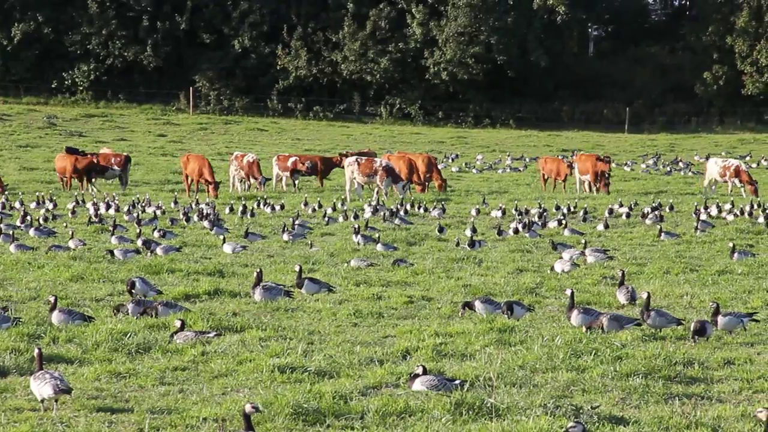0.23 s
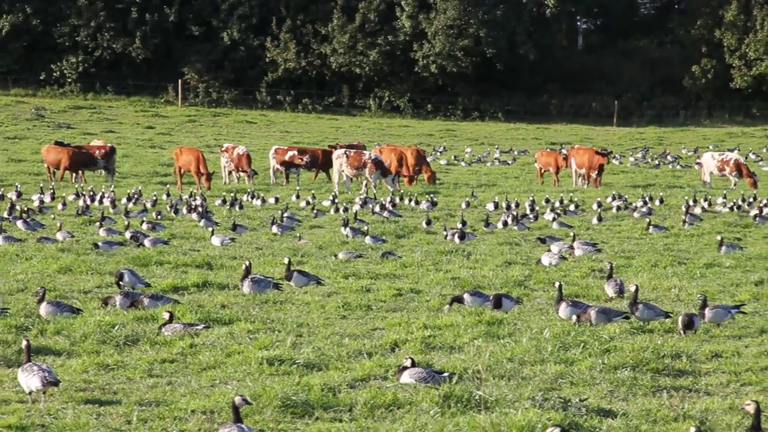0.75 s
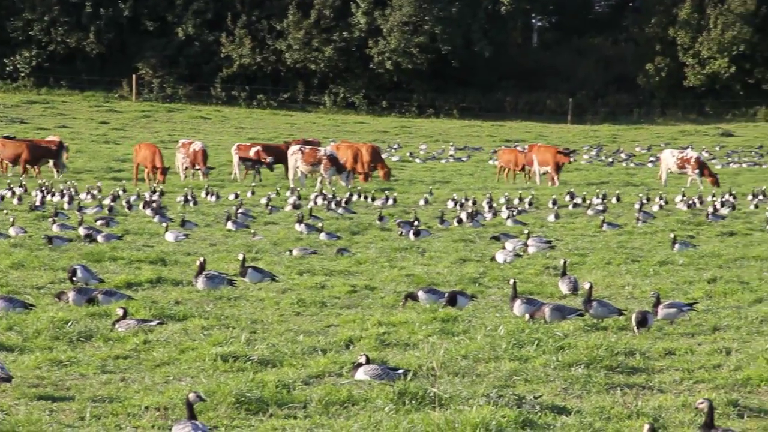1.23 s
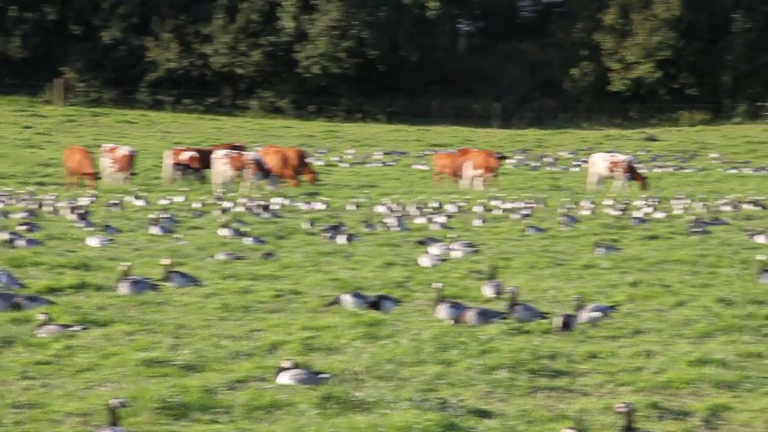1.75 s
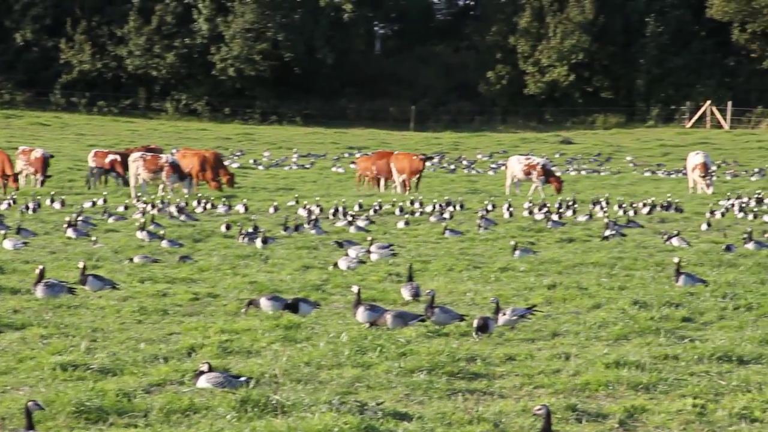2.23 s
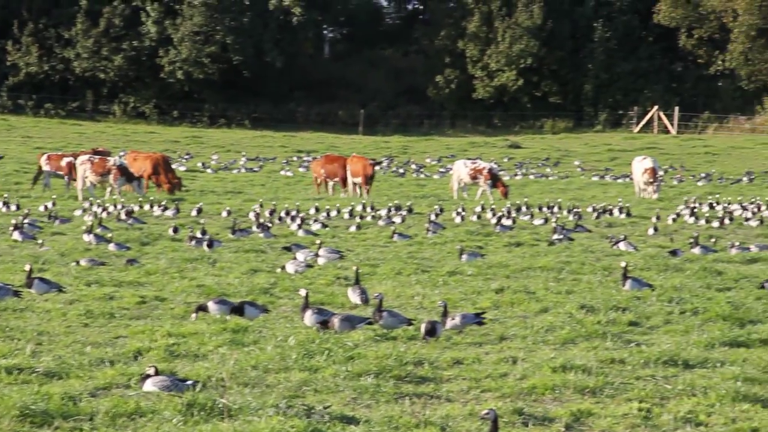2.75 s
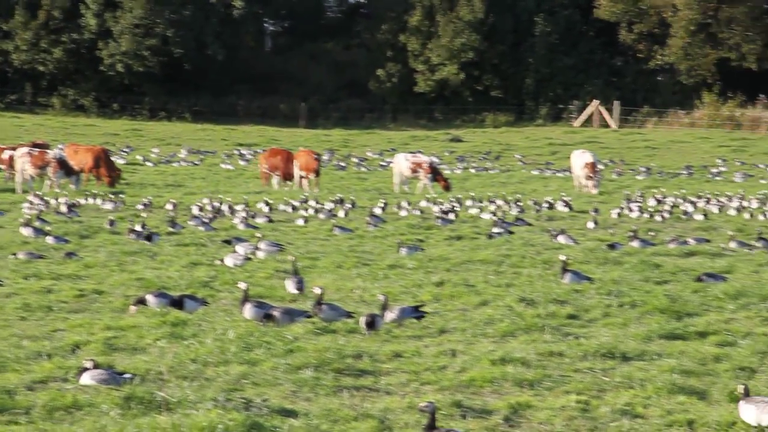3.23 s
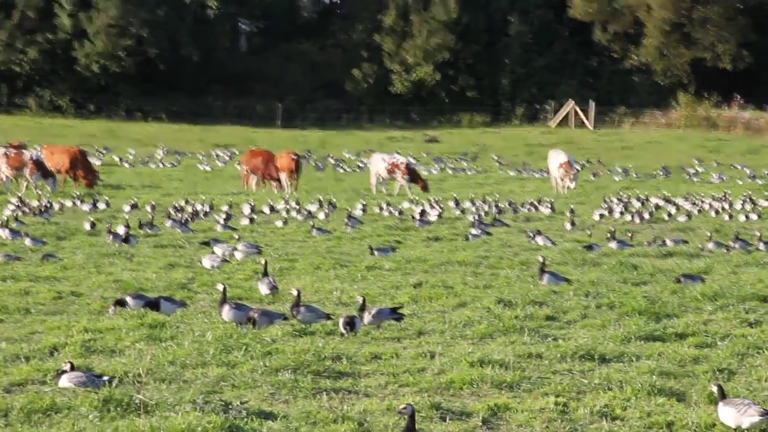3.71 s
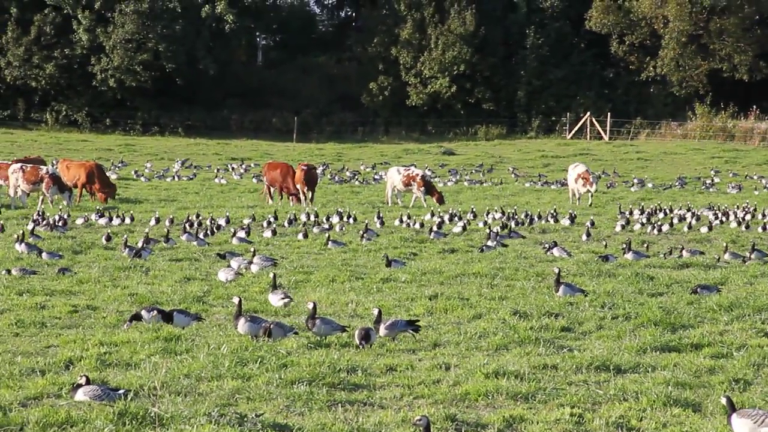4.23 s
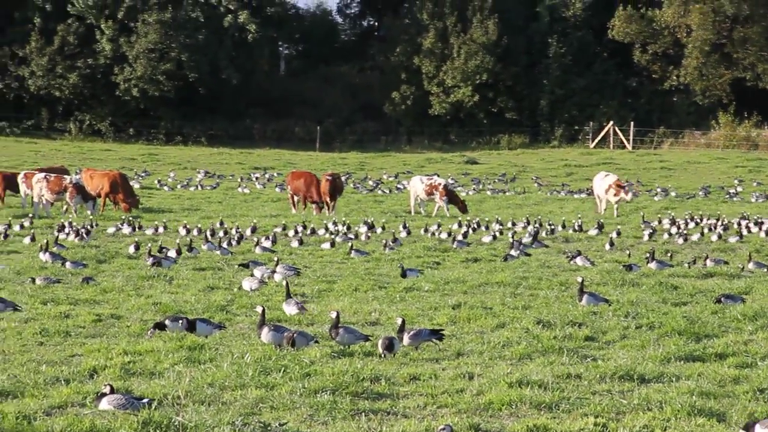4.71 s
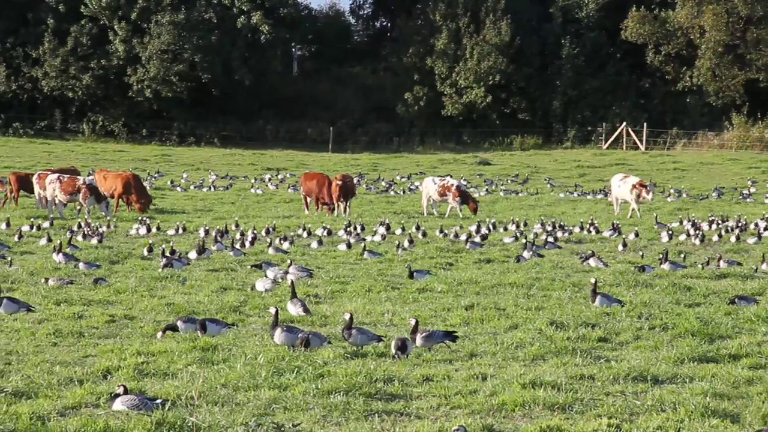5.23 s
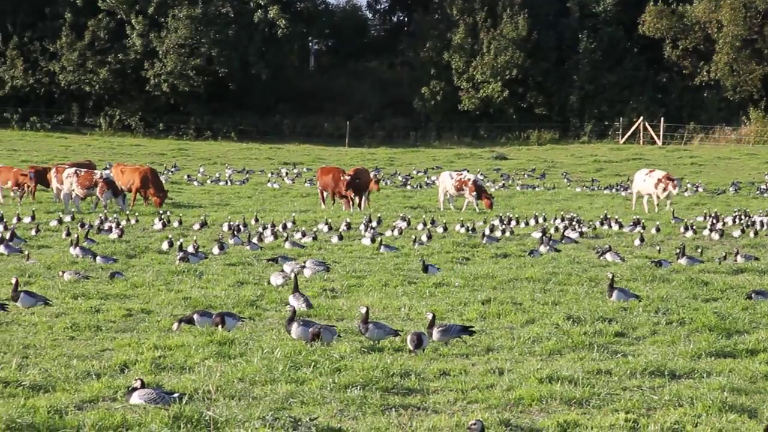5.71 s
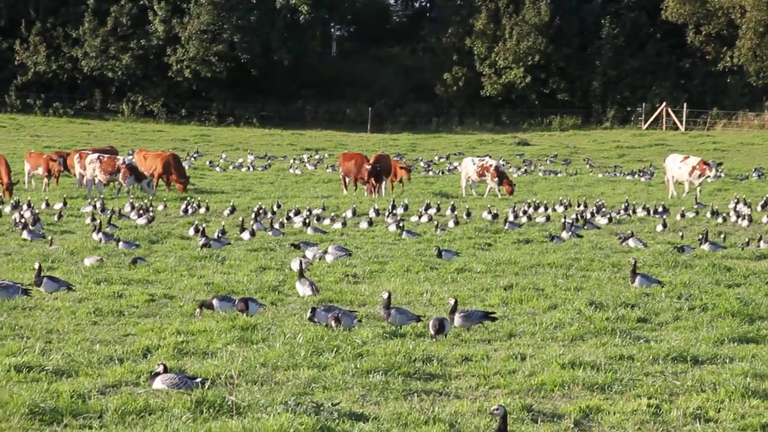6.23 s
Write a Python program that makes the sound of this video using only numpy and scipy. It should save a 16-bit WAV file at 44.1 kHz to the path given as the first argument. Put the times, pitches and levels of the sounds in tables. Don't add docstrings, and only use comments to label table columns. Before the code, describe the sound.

A large flock of geese yaps and barks continuously across an open windy pasture, one bird close by, wind thumping the microphone.

```python
import sys
import numpy as np
from scipy import signal
from scipy.fft import rfft, irfft
from scipy.io import wavfile
from scipy.ndimage import uniform_filter1d

SR = 44100
rng = np.random.default_rng(int(sys.argv[2]) if len(sys.argv) > 2 else 0)


def natural_amplitude(level_db):
    exponent = np.asarray(level_db, float) / 20
    return 10 ** exponent


def dump_mix(stems):
    frames = np.atleast_2d(stems).T
    limited = np.clip(frames, -1, 1)
    pcm = np.round(limited * 32767).astype(np.int16)
    wavfile.write(sys.argv[1], SR, pcm)


N = 284886

LONGEST = 8500
HOOK = 1.15

# f/Hz, gain/dB
THROAT = [(700, -32.5), (1300, -14), (1500, -5), (1750, 2), (2300, -2), (2700, -5.5), (3100, -11),
          (4200, -19.5), (5200, -13), (6200, -15.5), (7500, -23.5), (10000, -31), (12000, -29.5),
          (15500, -59)]


def curve(table):
    rows = np.array(table, float)
    return np.interp(np.arange(N) / SR, rows[:, 0], rows[:, 1])


def shape_db(points, hz):
    rows = np.array(points, float)
    return np.interp(np.log(np.maximum(hz, 1)), np.log(rows[:, 0]), rows[:, 1])


def colour(x, points, size=4096):
    hz = np.arange(size // 2 + 1) * SR / size
    cepstrum = irfft(np.log(natural_amplitude(shape_db(points, hz))), size)
    cepstrum[1:size // 2] *= 2
    cepstrum[size // 2 + 1:] = 0
    impulse_response = irfft(np.exp(rfft(cepstrum)), size)
    return signal.oaconvolve(x, impulse_response)[:N]


def unit(x):
    return x / np.sqrt(np.mean(x ** 2))


def walk(rate, size=N):
    hold = max(int(SR / rate), 1)
    steps = np.repeat(rng.standard_normal(size // hold + 1), hold)
    return 1.19 * uniform_filter1d(uniform_filter1d(steps, hold), hold)[:size]


def field():
    # f/Hz, density/(dB per Hz)
    spectrum = [(88, -19.5), (150, 0), (530, -11.5), (813, -8), (1270, -12.5), (1840, -12), (2610, -25),
                (3850, -33.5), (5350, -32), (7450, -41.5), (15600, -45.5)]
    # t/s, level/dB
    swell = [(0.0, -38.5), (1.6, -39), (2.3, -39.5), (2.6, -37.5), (3.1, -39), (4.6, -40), (5.2, -38.5),
             (6.46, -38.5)]
    out = np.zeros(N)
    for hz in 200 * 2. ** np.arange(7):
        band = [(hz / 2, -40), (hz / 1.71, -3), (hz, 0), (hz * 1.48, -3), (hz * 2, -40)]
        out += natural_amplitude(1.34 * walk(5.42)) * colour(rng.standard_normal(N), band)
    return natural_amplitude(curve(swell) + 3.0) * unit(colour(out, spectrum))


def drone():
    firing_hz = 72.86
    # multiple of the firing rate, level/dB
    orders = [(4, -5), (5, 5.5), (6, 0.5), (10, 0.5)]
    # t/s, level/dB
    level = [
        (0, -95),
        (.3, -46),
        (1.1, -48.5),
        (1.5, -87),
        (2.4, -54),
        (2.9, -49.5),
        (3.5, -52.5),
        (4.0, -87),
        (6.46, -71),
    ]
    phase = 2 * np.pi * np.cumsum(firing_hz * (1 + 0.007 * walk(6))) / SR
    lines = sum(natural_amplitude(db + 3.0 * walk(5.77)) * np.sin(k * phase) for k, db in orders)
    return natural_amplitude(curve(level)) * lines


def wind():
    # t/s, level/dB
    gust = [(0.0, -34.5), (0.32, -36), (0.74, -29.5), (0.86, -36.5), (1.4, -39.5), (2.39, -33), (2.5, -30),
            (3.17, -38), (3.54, -31.5), (3.62, -30), (3.72, -33), (3.89, -35.5), (4.5, -35), (4.71, -37.5),
            (4.88, -35), (5.59, -35), (6.24, -40.5), (6.46, -51.5)]
    # f/Hz, density/(dB per Hz)
    rumble = [(12, -46), (20, -16), (69, 1.5), (114, 2), (203, -10.5), (325, -16.5), (365, -19.5),
              (600, -18.5), (780, -18), (1320, -120)]
    # t/s, peak level/dB
    slow_thumps = [(0.374, -15.5), (.423, -14.5), (.44, -16), (0.597, -11), (.64, -15.5), (0.677, -15),
                   (0.785, -21), (0.829, -16), (.885, -13), (1.363, -6), (1.921, -14), (2.17, -15.5),
                   (2.323, -17), (2.466, -16.5), (2.777, -18), (3.295, -14.5), (3.331, -22), (3.433, -16),
                   (3.463, -16.5), (3.558, -15), (3.584, -14), (3.618, -18), (3.717, -16), (3.756, -20),
                   (3.766, -15.5), (3.78, -16), (3.897, -18), (5.275, -18)]
    # t/s, peak level/dB
    quick_thumps = [(.31, -13.5), (.32, -13), (.569, -11), (.623, -9.5), (1.211, -9), (1.466, -19),
                    (1.639, -13), (2.13, -14.5), (2.36, -15.5), (2.407, -18), (2.62, -12.5), (2.642, -17),
                    (2.807, -13), (2.892, -18), (3.413, -17), (3.515, -13.5), (3.65, -17), (3.676, -12.5),
                    (3.951, -17.5), (4.768, -20), (5.033, -22), (4.16, -22.5), (4.047, -21), (5.286, -17.5),
                    (5.329, -20), (5.452, -19), (5.439, -21)]
    lumps = natural_amplitude(4.2 * walk(45))
    out = natural_amplitude(curve(gust) + 2.0) * unit(colour(lumps * rng.standard_normal(N), rumble))
    for table, hz in ((slow_thumps, 116), (quick_thumps, 158.6)):
        for when, db in table:
            centre = int(when * SR)
            cycles = np.arange(-700, 1400) * hz / SR
            width = np.where(cycles < 0, .45, .75)
            edge = 0.26 * np.sin(2 * np.pi * 2.2 * cycles) * np.exp(-(cycles / 0.21) ** 2)
            thump = (np.sin(2 * np.pi * cycles) + edge) * np.exp(-(cycles / width) ** 2)
            out[centre - 700:centre + 1400] += natural_amplitude(db - 2.5) * thump
    return out


def rustles():
    # t/s, length/s, centre f/Hz, bandwidth/octaves, level/dB
    swishes = [(4.28, 0.15, 11000, .85, -50.5), (5.42, .06, 5700, 0.28, -45), (5.425, .05, 9500, .5, -58),
               (5.83, .13, 11000, .85, -58), (2.04, .07, 9800, .85, -48.5), (3, .045, 4100, .85, -48),
               (2.04, 0.066, 6100, 0.42, -40.5), (3.1, .08, 12000, .85, -60), (3.692, .06, 11500, .85, -61),
               (5.265, 0.055, 5600, .3, -48), (5.345, .045, 5800, .3, -53), (3.945, .07, 5800, .45, -51),
               (3.774, .007, 5500, 1.2, -50), (1.845, 0.055, 5900, 0.27, -45), (1.5, .09, 5300, 0.32, -49),
               (1.892, .006, 4200, .4, -46), (6.285, .05, 5700, .3, -47), (.545, .025, 3800, .1, -55)]
    out = np.zeros(N)
    for start, length, hz, octaves, db in swishes:
        size, first = int(length * SR), int(start * SR)
        half = 2 ** (octaves / 2)
        band = signal.butter(2, [hz / half, min(hz * half, 20000)], "band", fs=SR, output="sos")
        swish = unit(signal.sosfilt(band, rng.standard_normal(LONGEST)))
        swish = swish * natural_amplitude(2.0 * walk(51, size=LONGEST))
        out[first:first + size] += natural_amplitude(db) * signal.windows.tukey(size, .7) * swish[:size]
    return out


def add_call(bus, start, length, hz, glide, arch, db, lines, throat, treble_db=0., knee_hz=2360.0, jitter=.004,
             rasp=.2, scatter=0.99, swell=2.24, scoop=1., strain=1.6, unlock=1.33):
    tiers_hz = [3500, 7000, 10000]
    multiple, line_db = lines
    size = min(int(length * (1 + HOOK) / 2 * SR), LONGEST)
    tremble, shimmer, flutter = (walk(rate, size=LONGEST)[:size] for rate in (350, 1500, 70))
    shimmer = 1.2 * (shimmer - uniform_filter1d(shimmer, SR // 250))
    chance = rng.standard_normal((2, len(multiple)))

    u = np.linspace(-1, HOOK, size)
    lean = np.where(u < 0, scoop, 2 - scoop)
    sag = arch * lean * np.abs(u) ** 2.46
    pitch = hz * np.exp((glide * u - sag) / 100 + jitter * tremble)
    phase = 2 * np.pi * np.cumsum(pitch) / SR

    line_hz = multiple * hz
    octaves_up = np.maximum(np.log2(line_hz / knee_hz), 0)
    gain = natural_amplitude(line_db + treble_db * octaves_up + 3.2 * scatter * chance[0])
    heard = (gain * natural_amplitude(shape_db(throat, line_hz)))[(line_hz > 1400) & (line_hz < 3200)]
    keep = (line_hz > 600) & (line_hz < SR / 2.7)
    offset = (unlock * line_hz / knee_hz * chance[1])[keep, None]
    angle = np.outer(multiple[keep], phase) + offset
    partials = gain[keep, None] * np.cos(angle.astype(np.float32))

    tier = np.digitize(line_hz[keep], tiers_hz)
    effort = np.clip(1 - np.where(u < 0, -u ** 3, (u / HOOK) ** 2), 0, 1)
    voice = np.zeros(size)
    for k in range(len(tiers_hz) + 1):
        voice += partials[tier == k].sum(axis=0) * effort ** (swell * (1 + strain * k))
    voice *= (1 + rasp * shimmer) / np.sqrt(1 + rasp ** 2) * natural_amplitude(.7 * flutter)
    voice *= natural_amplitude(db + 4.5) / np.sqrt(np.sum(heard ** 2) / 2)
    first = int(start * SR)
    bus[first:first + size] += voice[:N - first]


def two_voices():
    mixing = [-45, 1, 3, 1.5, -29]
    lower_voice = .637
    upper, lower = np.meshgrid(np.arange(1, 15), np.arange(-2, 3))
    line_db = np.array(mixing, float)[:, None] / (1 + 0.068 * upper)
    return (upper + lower_voice * lower).ravel(), line_db.ravel()


def crowd(count=45):
    # t/s, length/s, level/dB
    open_barks = [(.065, 0.11, -37.5), (.188, 0.13, -42.5), (.52, 0.13, -56), (1.292, 0.15, -41.5),
                  (1.497, .14, -39.5), (1.679, 0.13, -35), (1.8, 0.13, -38), (1.979, 0.056, -51),
                  (2.03, .13, -33.5), (2.159, 0.17, -46.5), (2.615, 0.22, -41), (2.84, .16, -33.5),
                  (3.071, 0.15, -29.5), (3.658, .11, -29), (3.82, 0.099, -34), (4.302, 0.23, -43.5),
                  (4.697, .17, -34.5), (5.075, 0.082, -31), (5.349, 0.19, -41.5), (5.742, 0.17, -34.5),
                  (6.143, 0.12, -46.5), (6.241, 0.16, -37)]
    # t/s, length/s, level/dB
    muffled_barks = [(.343, 0.19, -37.5), (.644, 0.19, -38.5), (.778, 0.18, -35), (1, 0.17, -39.5),
                     (1.164, 0.14, -36.5), (1.414, 0.16, -37), (2.355, 0.11, -38), (2.449, 0.13, -41.5),
                     (2.813, 0.09, -34.5), (2.954, .12, -35), (3.22, 0.055, -36), (3.211, 0.2, -38),
                     (3.514, .19, -39), (3.917, 0.23, -38.5), (4.039, 0.18, -31.5), (4.172, 0.17, -38),
                     (4.394, 0.12, -42), (4.548, 0.12, -34), (4.664, 0.065, -34), (4.884, 0.081, -33.5),
                     (5.225, 0.1, -38.5), (5.238, .15, -34.5), (5.495, .13, -31), (5.627, 0.095, -36.5),
                     (5.866, 0.16, -41), (5.996, .19, -36), (6.4, 0.061, -40.5)]
    bus, stack = np.zeros(N), (np.arange(1., 24), np.zeros(23))
    for table, tilt_db in ((open_barks, -1.46), (muffled_barks, -7)):
        for start, length, db in table:
            for k, (high, slide) in enumerate(rng.random((3, 2))):
                add_call(bus, start + .21 * k * length, .55 * length, 330 + 250 * high, 3 - 9 * slide, 6.,
                         db - 1.5, stack, THROAT, tilt_db, jitter=.015, rasp=.65, strain=1.2)
    for k, (late, long, high, slide) in enumerate(rng.random((count, 4))):
        start = (k + late) / count * N / SR
        add_call(bus, start, 0.0595 + 0.0555 * long, 680 + 250 * high, 1 - 7 * slide, 7.,
                 -52, stack, THROAT, -3., jitter=0.0049, rasp=0.67)
    return colour(bus, THROAT)


def flock():
    # t/s, length/s, upper voice f/Hz, level/dB, treble/dB
    duos = [(.66, 0.1, 1110, -42, -10), (.82, 0.16, 1132, -43, -8.5), (1.03, 0.062, 1127, -36, -36),
            (1.179, 0.12, 1118, -42, -8), (1.413, 0.064, 1156, -37.5, -29),
            (2.057, 0.18, 1121, -38.5, -16.5), (2.349, 0.092, 1120, -32.5, -16.5),
            (2.666, 0.07, 1115, -34.5, -14), (2.952, 0.07, 1092, -34, -15), (3.11, 0.061, 1150, -30.5, -7),
            (3.292, .063, 1139, -39, -13.5), (3.525, 0.15, 1090, -44.5, -25),
            (4.506, 0.073, 1095, -32, -16.5), (4.903, 0.092, 1088, -36, -34)]
    # t/s, length/s, f/Hz, glide/%, level/dB
    bright = [
        (1.345, 0.073, 865, 0, -38.5),
        (1.742, 0.067, 760, 0.5, -33.5),
        (3.185, 0.058, 853, 0, -29),
        (3.245, .045, 775, -2, -47),
        (3.868, 0.063, 852, -1, -35),
        (5.45, .06, 836, -3, -40.5),
        (5.828, 0.07, 745, -2, -40),
        (6.315, .075, 924, -1, -34.5),
        (1.89, .05, 813, 0, -49),
    ]
    facing = [
        (0, 0.014, 794, -8, -39),
        (.301, 0.072, 749, -1, -43),
        (1.74, 0.051, 893, -8, -39),
        (2.032, 0.079, 304, -2, -35),
        (2.295, 0.04, 790, 0, -44),
        (2.486, 0.082, 863, -1.5, -42),
        (3.065, 0.095, 910, -6, -34.5),
        (3.684, 0.078, 886, 2.5, -34),
        (5.554, 0.068, 896, -4.5, -36),
        (5.782, 0.052, 677, -3.5, -35.5),
    ]
    facing_flat = [(.167, 0.067, 830, -4, -47), (.248, .05, 830, -1.5, -45), (.89, 0.065, 925, -1, -38.5),
                   (1.843, 0.048, 787, 0.5, -37.5), (2.26, 0.075, 675, 0, -44), (3.1, 0.12, 850, -5.5, -50),
                   (3.674, 0.061, 716, 3, -36), (3.684, 0.0663, 803, 4, -35), (4.577, 0.086, 738, 10, -39),
                   (5.914, 0.064, 768, -5, -45), (6.263, 0.086, 690, 3, -37.5)]
    away = [(.393, 0.07, 850, 0, -35), (.45, .055, 795, -2, -39), (1.178, 0.08, 847, 1.5, -31.5),
            (1.813, 0.11, 850, -5, -34.5), (1.985, 0.048, 821, 6, -39.5), (2.016, 0.057, 920, 3, -39),
            (2.367, 0.069, 733, 0, -37.5), (2.631, 0.084, 849, -3, -33.5), (2.858, 0.099, 933, -1, -36),
            (3.24, 0.053, 770, -2.5, -36), (3.334, .077, 820, -4.5, -40), (5.245, 0.098, 683, -6.5, -36.5),
            (3.84, 0.074, 860, -0.5, -32), (3.934, 0.095, 916, -1.5, -40.5), (4.239, 0.034, 825, -2, -37),
            (4.312, 0.05, 744, -5.5, -37.5), (4.462, 0.088, 853, -1.5, -29.5), (4.592, 0.05, 776, 0.5, -35),
            (5.345, 0.074, 822, -2.5, -34), (4.135, 0.1, 907, 0, -40), (3.625, 0.05, 776, 3.5, -34.5),
            (5.799, 0.044, 852, -7.5, -36.5), (5.985, 0.049, 778, 4, -35.5)]
    away_flat = [(.085, 0.09, 900, -1, -42), (.606, 0.058, 685, -4.5, -44.5), (2.735, .07, 735, -2, -42),
                 (1.09, .07, 730, -3, -43), (.695, .055, 720, -1, -41), (1.005, 0.14, 729, 0, -44.5),
                 (1.315, 0.052, 810, 3, -38.5), (1.507, 0.041, 948, -1.5, -33),
                 (2.521, 0.041, 773, -11, -39), (2.821, 0.083, 747, 4, -38), (3.08, 0.056, 719, 5, -37),
                 (3.192, 0.11, 800, -5, -51), (4.242, 0.04, 724, -1, -37.5), (4.691, 0.044, 820, -1.5, -33),
                 (5.259, 0.093, 827, -3.5, -34.5), (6.352, 0.057, 840, -9, -40)]
    yelp_arch, flat_arch = 8., .3
    bus, stack = np.zeros(N), (np.arange(1., 30), np.zeros(29))
    for start, length, hz, db, treble_db in duos:
        add_call(bus, start, length, hz, -1.37, 2.97, db, two_voices(), THROAT, treble_db + 8.5,
                 jitter=0.0087, rasp=0.21)
    honks = ((bright, yelp_arch, -2.1), (facing, yelp_arch, -3.), (facing_flat, flat_arch, -3.),
             (away, yelp_arch, -10.), (away_flat, flat_arch, -10.))
    for table, arch, tilt_db in honks:
        for start, length, hz, glide, db in table:
            bend = arch * .07 / max(length, .04)
            add_call(bus, start, length, hz, glide, bend, db, stack, THROAT, tilt_db, jitter=.0045,
                     rasp=.16, scatter=.9, swell=.55, scoop=.6, strain=1.1)
    return colour(bus, THROAT)


def near_bird():
    # t/s, length/s, glide/%, level/dB, top treble/(dB per octave)
    barks = [
        (4.064, 0.09, 0.9, -27.5, -3.5),
        (4.402, 0.084, 0.23, -26.5, -6),
        (4.756, 0.085, 0.39, -25.5, -9),
        (5.064, 0.0706, 4.2, -27, -17),
        (5.518, 0.084, 4.9, -29, -20),
    ]
    # f/Hz, gain/dB
    near_throat = [(700, -63), (1150, -17), (1500, -13), (1900, -3.5), (2600, -7.5), (3000, -13.5),
                   (4200, -15), (5200, -9.5), (6700, -19.5), (8200, -14.5), (9800, -27.5), (11000, -16.5),
                   (13200, -15), (15500, -33)]
    bus = np.zeros(N)
    for start, length, glide, db, top_db in barks:
        add_call(bus, start, length, 1125, glide, 8., db, two_voices(), near_throat, top_db, knee_hz=6500.,
                 jitter=.011, rasp=.45, scatter=1., swell=.9, scoop=1.3, strain=1.1, unlock=2.3)
    return -colour(bus, near_throat)


def scene():
    birds = rustles() + crowd() + flock() + near_bird()
    t = np.arange(int(.4 * SR)) / SR
    tail = rng.standard_normal(len(t)) * np.exp(-np.log(1000) * t / 0.92)
    scatter = signal.fftconvolve(birds, tail / np.sqrt(np.sum(tail ** 2)))[:N]
    return (field() + drone() + wind() + birds + natural_amplitude(-29.0) * scatter)[None]


def band_limit(x):
    return signal.sosfilt(signal.butter(12, 15730, fs=SR, output="sos"), x)


def record(dry):
    high_pass = signal.butter(2, 150, "high", fs=SR, output="sos")
    squeeze = signal.sosfilt(high_pass, dry ** 2)
    lopsided = dry - .7 * squeeze
    top_cut = signal.ellip(10, .2, 60, 15750, fs=SR, output="sos")
    return band_limit(signal.sosfilt(top_cut, lopsided))


dry = scene()
out = record(dry)
dump_mix(out)
```